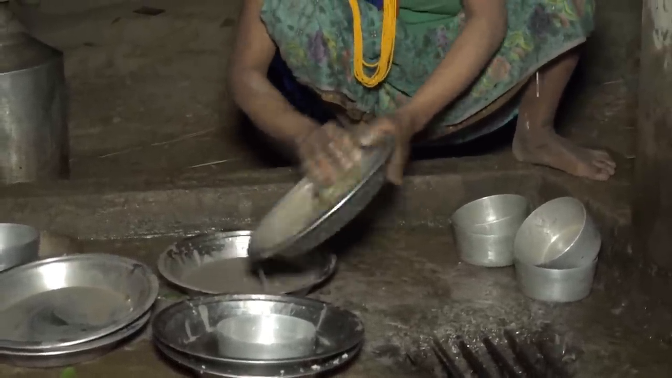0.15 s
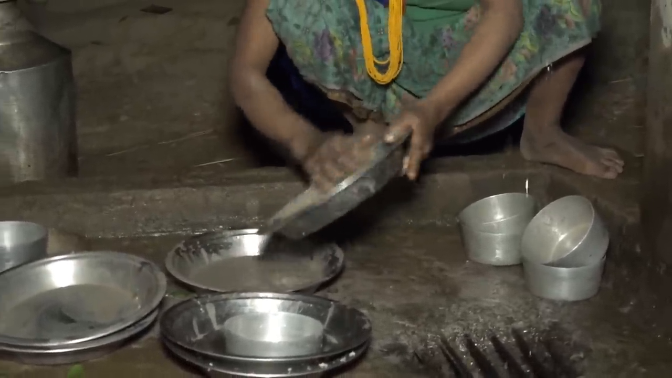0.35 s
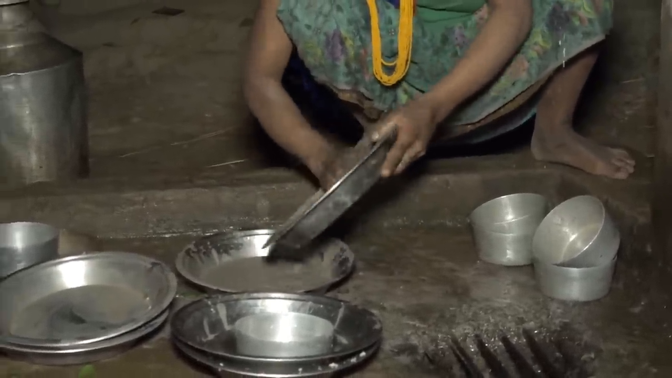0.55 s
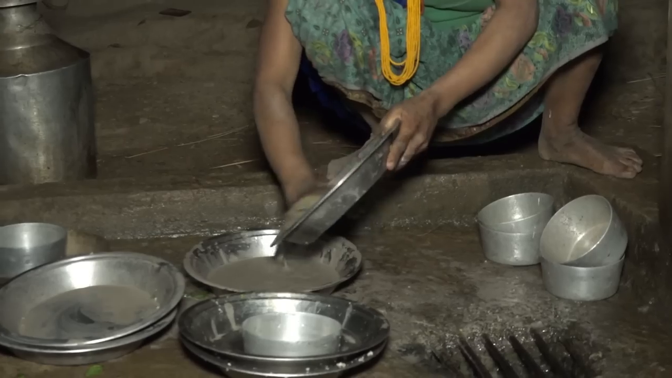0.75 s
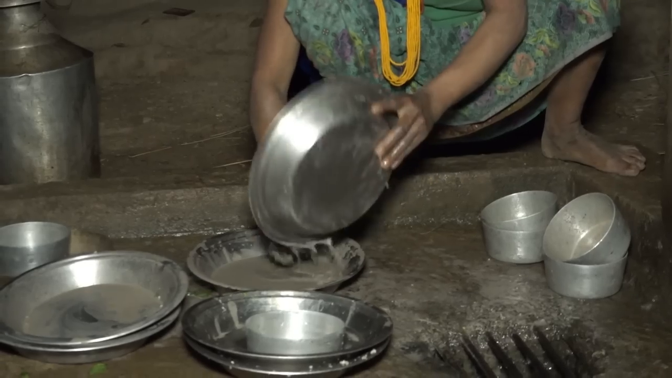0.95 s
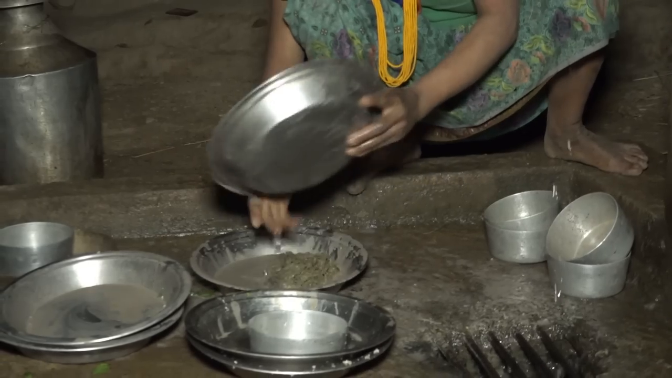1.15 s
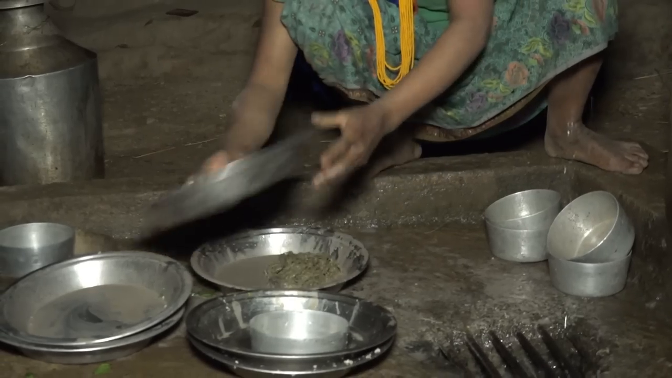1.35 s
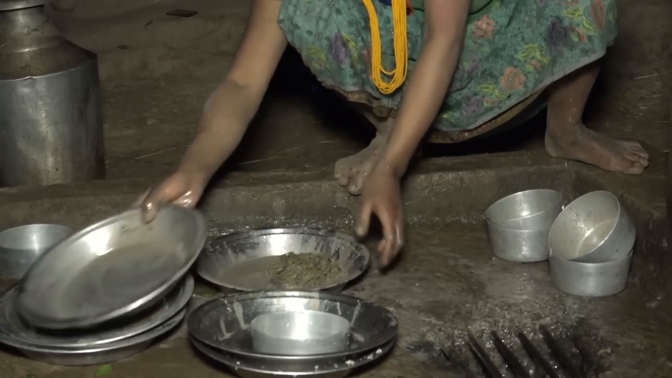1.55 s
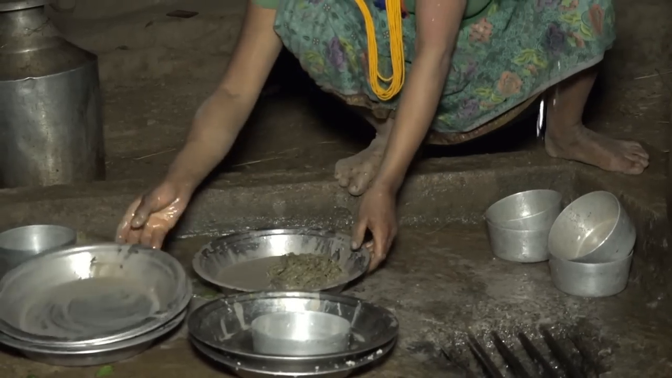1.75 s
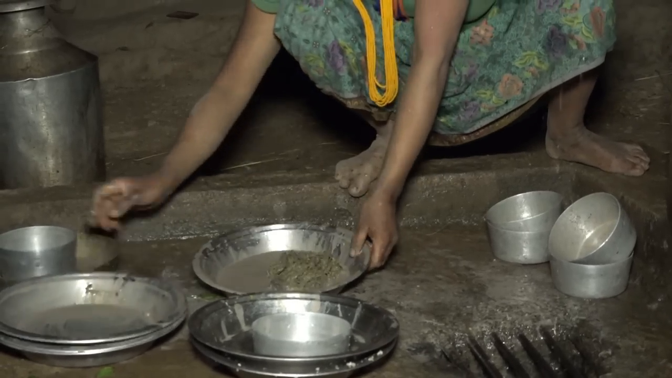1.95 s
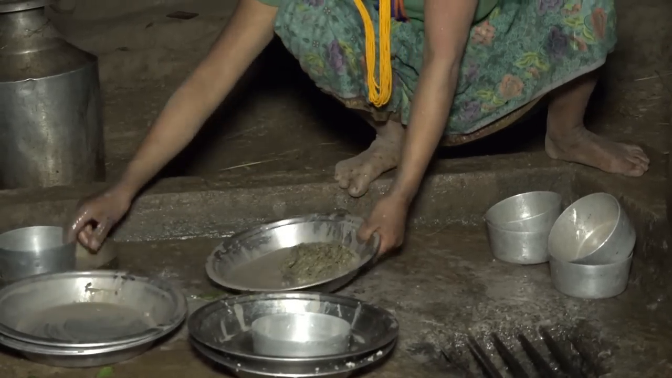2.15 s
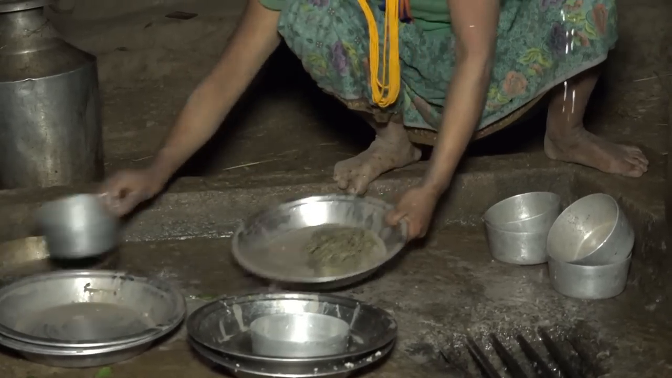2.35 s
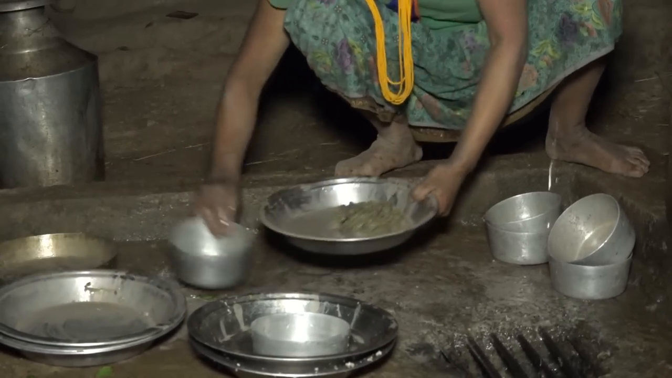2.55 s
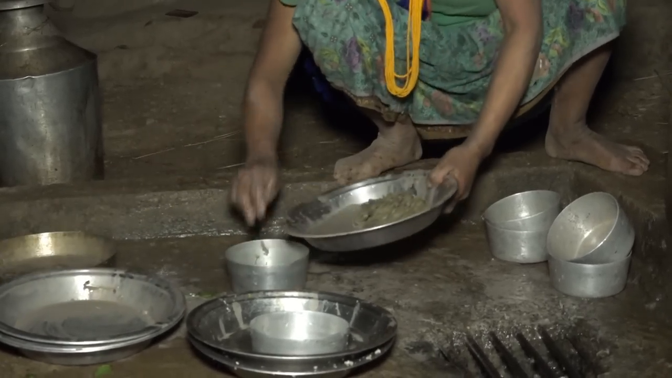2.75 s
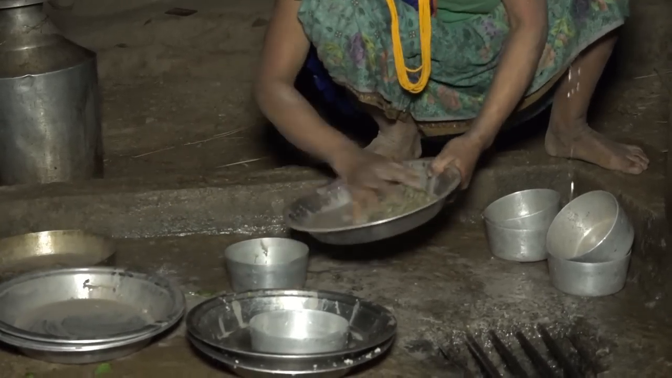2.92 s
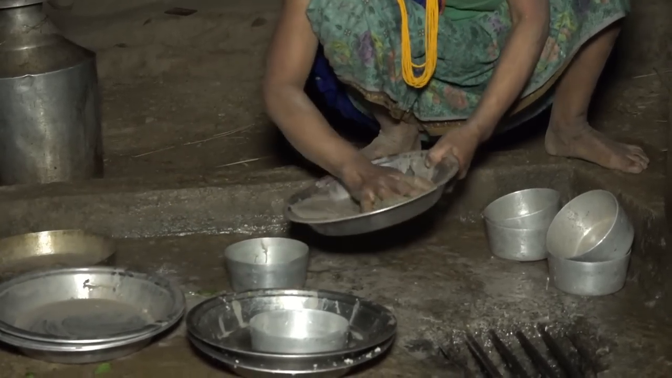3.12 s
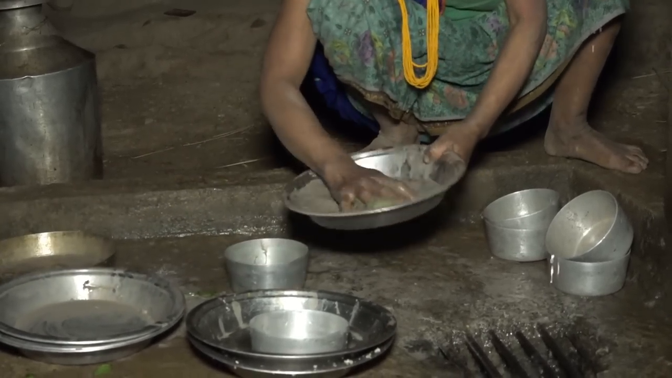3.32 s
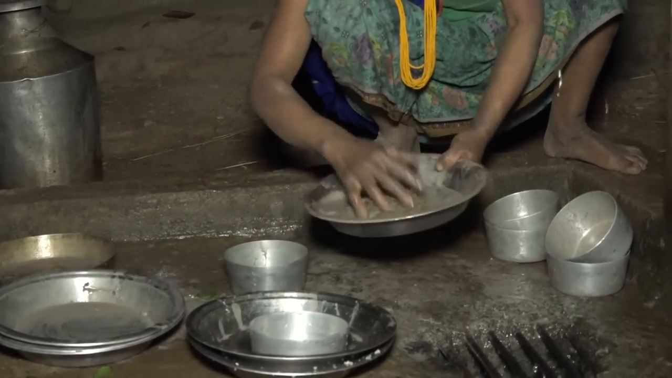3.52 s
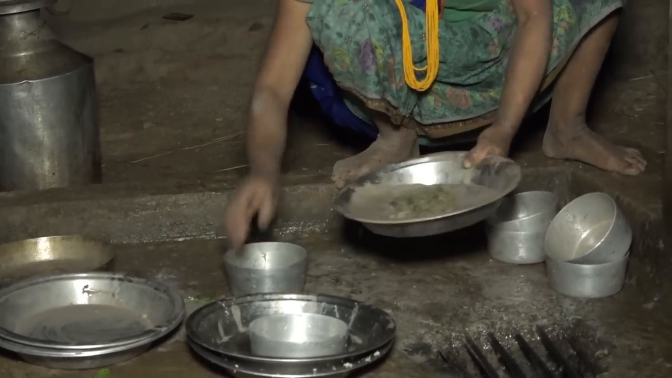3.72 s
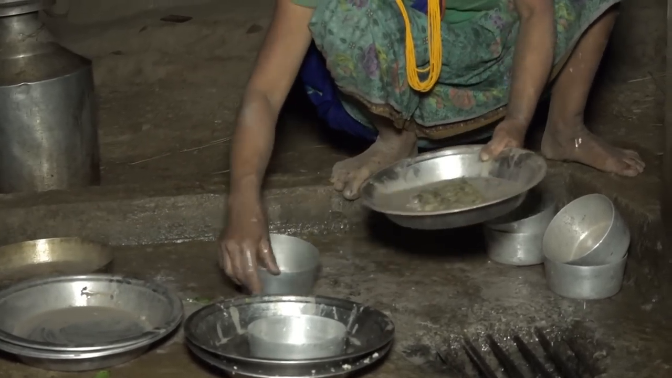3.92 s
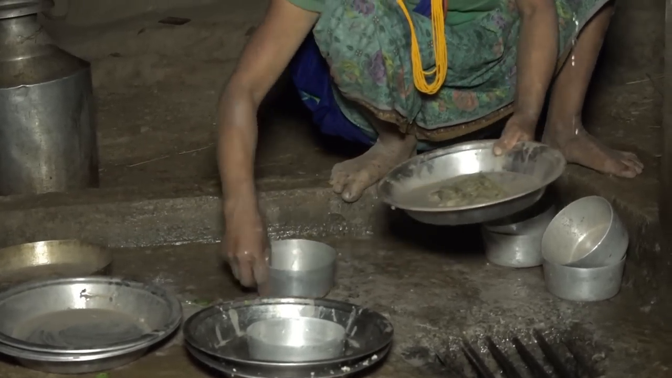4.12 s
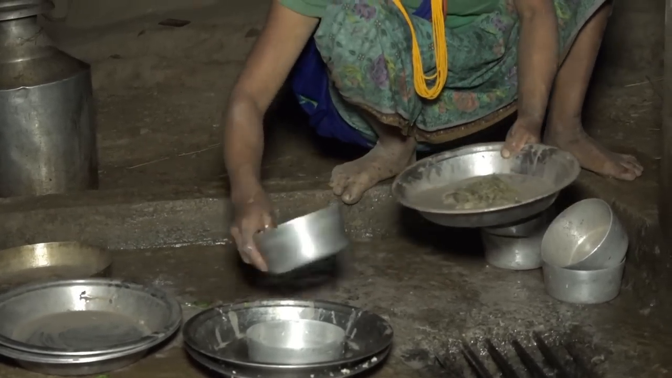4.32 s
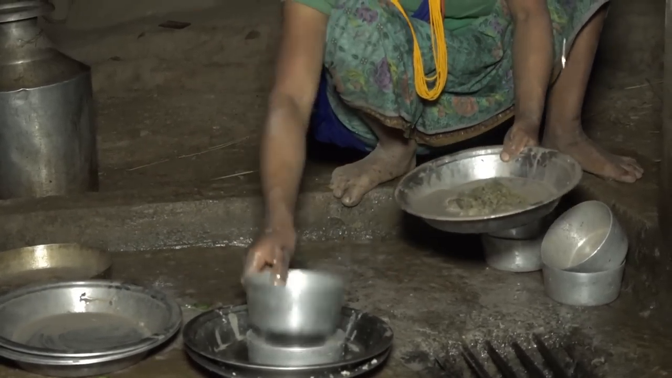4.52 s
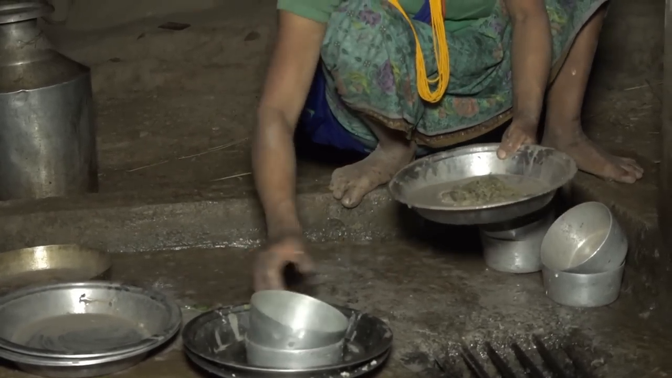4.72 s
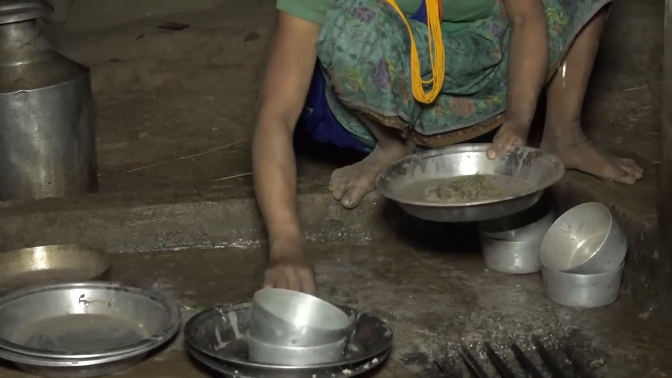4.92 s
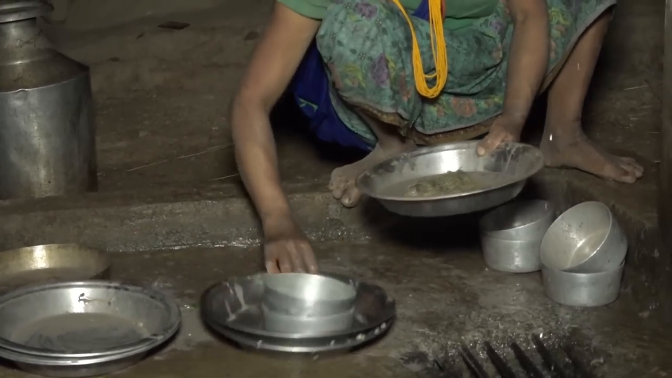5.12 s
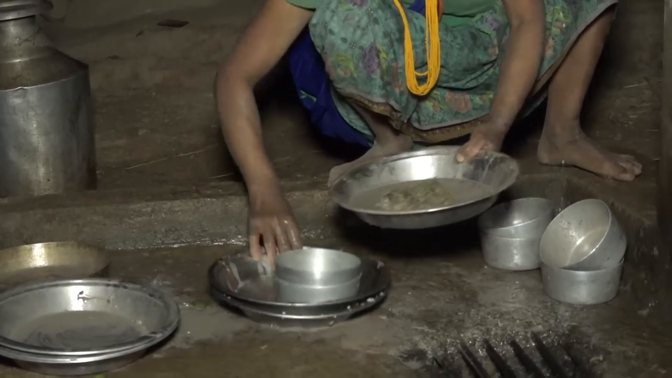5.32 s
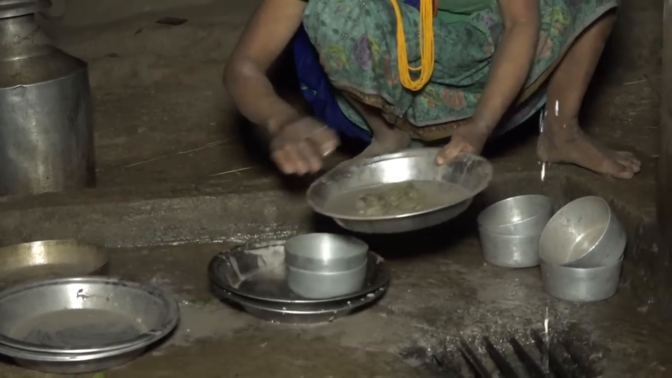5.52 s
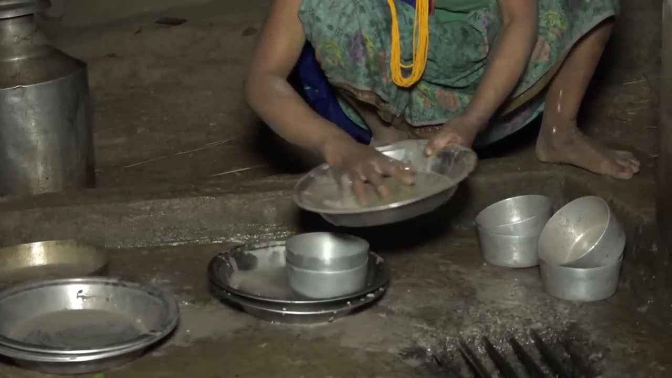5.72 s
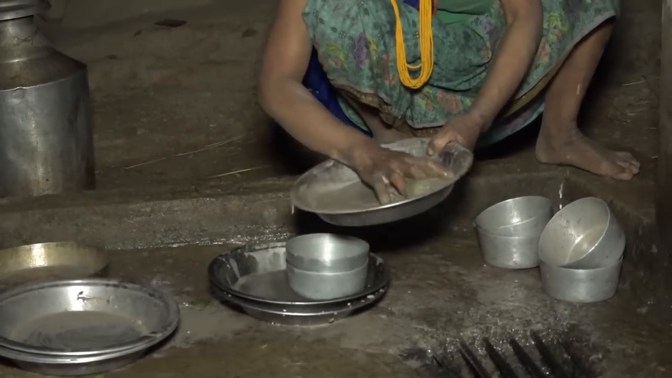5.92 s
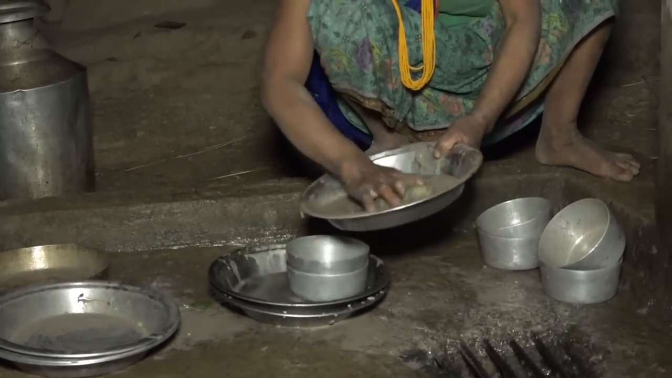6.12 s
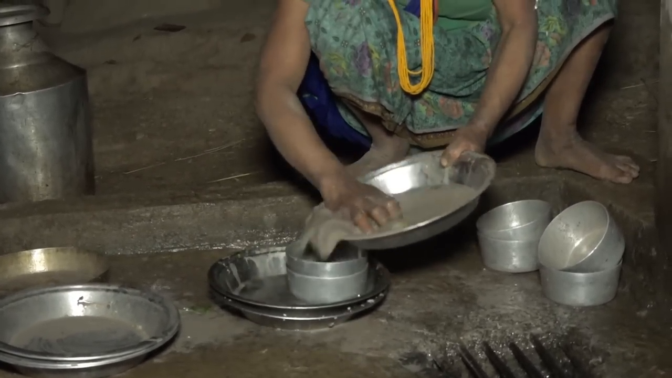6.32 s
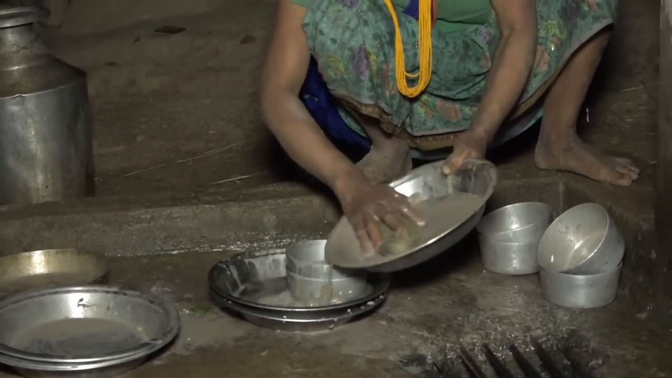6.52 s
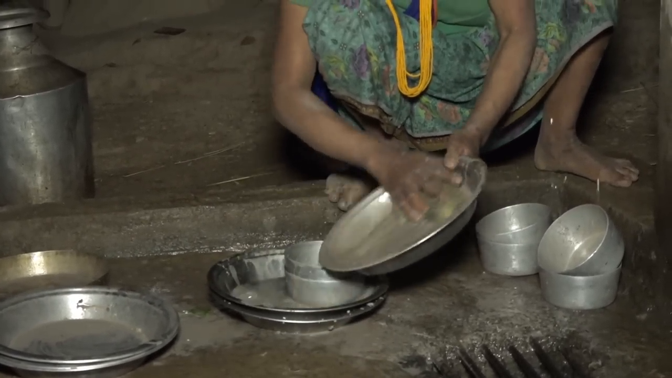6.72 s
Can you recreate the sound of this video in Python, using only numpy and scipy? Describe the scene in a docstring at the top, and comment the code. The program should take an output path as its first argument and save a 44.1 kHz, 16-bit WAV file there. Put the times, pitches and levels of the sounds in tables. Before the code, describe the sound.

Close up on a wet stone floor in a small room, water drops patter brightly while a hand rubs metal plates. A plate clashes and rasps onto a stack, a bowl is set down with a clank, then tipped and dropped into another. The pile scrapes over gritty stone, and finally water spatters and slops down with a hollow plop. Short reverberation, near-centred stereo, quiet background.

```python
"""Metal plates are washed by hand on a wet stone floor in a small room, heard from close by.
First, water noise and drops of snap, spray and bubbles spatter; soon a wet hand scours with swelling noise strokes.
Then a plate clashes on the stack and slides home: random slips rasp and ring its modes. A bowl is dragged off the
floor, set down, tipped and dropped into another, each blow mixing decaying tones with puffs of noise.
Last, the pile is dragged over the gritty floor, drops and slops fall, and poured water rumbles in low puffs."""
import sys
import numpy as np
from scipy import signal
from scipy.fft import rfft, irfft, next_fast_len
from scipy.io import wavfile
from scipy.ndimage import uniform_filter1d, map_coordinates

SR = 44100
rng = np.random.default_rng(int(sys.argv[2]) if len(sys.argv) > 2 else 0)


def put_to_file(sound):
    """Save the sound as 16-bit audio at rate SR, in the file named by the first command-line argument."""
    columns = np.atleast_2d(sound).T  # one column per channel
    safe = np.clip(columns, -1, 1)
    whole_steps = np.round(safe * 32767)
    wavfile.write(sys.argv[1], SR, whole_steps.astype(np.int16))


N = 298116  # length in samples
T = np.arange(SR // 2) / SR  # seconds since a blow
TOP_HZ = 16000  # nothing sounds above this


def amp(db):
    """Turn decibels into a plain gain."""
    return 10 ** (np.asarray(db) / 20)


def unit(x):
    """Scale x to an average (rms) level of 1."""
    return x / np.sqrt(np.mean(x ** 2) + 1e-20)


def struck(x):
    """Scale x to rms 1 over its first hundredth of a second."""
    return x / np.sqrt(np.mean(x[:SR // 100] ** 2) + 1e-20)


def along(points, hz):
    """Read a curve of (Hz, value) points, joined by straight lines on a log frequency axis."""
    f, v = np.transpose(points)
    return np.interp(np.log(hz + 1), np.log(f + 1), v)


def fade(t, t60):
    """Die away steadily, by 60 dB in t60 seconds."""
    return np.exp(-np.log(1000) * t / t60)


def add(track, s, x):
    """Mix x into the track at time s."""
    part = track[max(round(s * SR), 0):][:len(x)]
    part += x[:len(part)]


def wobble(rate):
    """Draw a smooth random curve through `rate` random points a second."""
    points = rng.standard_normal(int(N * rate / SR) + 4)
    return map_coordinates(points, [np.arange(N) * rate / SR])


def shaped(x, db_of_hz):
    """Filter x to a dB curve, with no sound ahead of its cause (a minimum-phase filter)."""
    m = 2 * next_fast_len(min(len(x), len(x) // 2 + SR // 4), real=True)
    gain = amp(db_of_hz(np.fft.rfftfreq(m, 1 / SR)))
    cepstrum = irfft(np.log(gain + 1e-6), m)
    # folding the second half onto the first makes the filter causal
    cepstrum[1:m // 2] *= 2
    cepstrum[m // 2 + 1:] = 0
    return irfft(rfft(x, m) * np.exp(rfft(cepstrum)), m)[:len(x)]


def coloured(x, spectrum):
    """Give x the colour of (Hz, dB) points."""
    return shaped(x, lambda hz: along(spectrum, hz))


def hill(hz, centre_hz, steep_db):
    """A hump in dB that is steep_db down an octave from its centre."""
    return -steep_db * np.log2((hz + 1) / centre_hz) ** 2


def grains(rate, spread_db):
    """Scatter tiny clicks of uneven size, about `rate` a second."""
    size = amp(spread_db * np.clip(rng.standard_normal(N), -2, 2))
    falls = rng.random(N) < rate / SR
    return unit(falls * size * rng.choice([-1, 1], N))


def burst(t60, rise=0.00017, size=4096):
    """A puff of noise that swells and dies."""
    t = T[:size]
    swell = np.minimum(t / rise, 1)
    return rng.standard_normal(size) * swell * fade(np.maximum(t - rise, 0), t60)


def puff(spectrum, t60):
    """The noise of a contact, with a given colour and life."""
    return struck(coloured(burst(t60, size=len(T)), spectrum))


def through(x, response):
    """Let every sample of x set off a response of energy 1 (convolution)."""
    return signal.fftconvolve(x, response / np.linalg.norm(response))[:N]


def ring(modes):
    """One blow on metal: each mode has a slightly new strength and an unsteady pitch."""
    hz, db, t60 = np.transpose(modes)[:, :, None]
    strength = amp(db + rng.standard_normal(hz.shape))
    waver = np.cumsum(rng.standard_normal((len(hz), len(T))), 1) * hz / SR * .02
    cycles = hz * T + waver + rng.random(hz.shape)
    waves = strength * np.sin(2 * np.pi * cycles) * fade(T, t60)
    soft_start = 1 - fade(T, .004)
    soft_end = np.minimum((T[-1] - T) * 10, 1)
    return struck(waves.sum(0) * soft_start * soft_end)


def bubbles(centre_hz, spread, t60, count=5, size=4096):
    """A few tiny bubbles ring out around one pitch, scattered by `spread` octaves."""
    t = T[:size]
    octaves, phase, db = np.clip(rng.standard_normal((3, count, 1)), -2, 2)
    pitch_hz = centre_hz * 2 ** (spread * octaves)
    waves = amp(2 * db) * np.sin(2 * np.pi * pitch_hz * t + phase)
    return struck(waves.sum(0) * fade(t, t60) * (1 - fade(t, 0.0096)))


# colour of a drop on wet stone, before its own tilt: (frequency [Hz], level per Hz [dB])
SPLAT_COLOUR = [(300, -35.5), (1000, -27), (1700, -21), (2400, -5), (3200, -10), (4300, -1.5), (6300, 3),
                (9200, 0.5), (12500, -6), (16000, -16)]
# usual attack and centre; bubbles against the slap, first snap gain before the drop is scaled
DROP_RISE_S, DROP_HZ, BUBBLE_DB, SNAP_DB = 0.00091, 6730, -5, -1.5


def drop(centre_hz, rise_s, size=1536):
    """A drop snaps on the wet stone, breaks into spray and traps bubbles, all around its own centre."""
    knots = np.geomspace(1500, TOP_HZ, 16)
    snap = amp(SNAP_DB) * burst(t60=0.004, rise=rise_s, size=size)
    spray = burst(t60=0.017, rise=rise_s, size=size) + burst(t60=.036, rise=rise_s, size=size)
    # a lower centre tilts the colour towards the bass; random bumps make each drop different
    tilt_db = 11 * np.log2(centre_hz / DROP_HZ) * np.log2(knots / centre_hz)
    own_colour = np.c_[knots, tilt_db + 3 * rng.standard_normal(len(knots))]
    slap = struck(shaped(snap + spray, lambda hz: along(SPLAT_COLOUR, hz) + along(own_colour, hz)))
    return slap + amp(BUBBLE_DB) * bubbles(0.81 * centre_hz, spread=0.3, t60=0.029, size=size)


PATTER_PER_S, PATTER_RANGE_DB = 61, 15.5  # rate of small drops, range of their sizes


def patter():
    """Small drops of random size, colour and softness fall at random moments."""
    out = np.zeros(N)
    for when, small, pitch, soft in rng.random((int(PATTER_PER_S * N / SR), 4)):
        splat = drop(DROP_HZ * 2 ** (.6 * (pitch - .4)), DROP_RISE_S * 4 ** (soft - .4))
        add(out, when * N / SR, amp(-PATTER_RANGE_DB * small) * splat)
    return out


# how much water runs off onto the floor: (time [s], level [dB])
RUNOFF_FLOW = [(0.0, -40.5), (0.4, -40), (0.65, -41), (0.95, -36), (1.2, -41.5), (1.55, -44), (2.05, -39.5),
               (2.3, -39.5), (2.5, -44), (3.15, -48), (3.75, -43), (4.1, -44), (4.75, -49.5), (5.45, -38.5),
               (5.6, -43), (5.75, -41), (6.1, -44), (6.76, -39.5)]
# colours of fizz, swirling water and rubbing: (frequency [Hz], level per Hz [dB])
FIZZ_COLOUR = [(1060, -46.5), (1800, -11), (2550, -1), (2920, -2), (4170, 2), (6020, 2), (9080, -2),
               (13300, -10.5), (16000, -6.5)]
SWIRL_COLOUR = [(60, -22.5), (130, -1.5), (350, 6.5), (550, 2.5), (900, -24)]
RUB_COLOUR = [(350, -13), (650, 6), (1200, 3.5), (2000, 2), (3200, -17)]
# against the flow: largest patter drops, then treble, middle and bass of the running water
PATTER_DB, FIZZ_DB, SPLASH_DB, GURGLE_DB = 7, -6, -19.5, -20.5


def runoff():
    """Water runs off onto the floor: its flow drives a patter, a fine fizz, a splash and a faint gurgle."""
    flow = amp(np.interp(np.arange(N) / SR, *np.transpose(RUNOFF_FLOW)))
    fizz = unit(coloured(grains(rate=6000, spread_db=4) * amp(2.5 * wobble(60)), FIZZ_COLOUR))
    splash = unit(coloured(grains(rate=3000, spread_db=4), RUB_COLOUR))
    gurgle = unit(coloured(rng.standard_normal(N), SWIRL_COLOUR))
    running = amp(FIZZ_DB) * fizz + amp(SPLASH_DB) * splash + amp(GURGLE_DB) * gurgle
    return flow * (amp(PATTER_DB) * patter() + running)


# the loudest single drops, of many pitches; one that has broken up in the air lands softly, with a slow rise:
# (time [s], slap level [dB], centre [Hz], rise [s])
LOUD_DROPS = [(0.019, -28, 7420, 0.00135), (0.133, -29.5, 6000, 0.00055), (0.218, -31.5, 4940, 0.00074),
              (0.253, -25.5, 5570, 0.00023), (0.3252, -31, 6930, 0.0033), (0.3771, -27, 6700, 0.0017),
              (0.544, -23, 6700, 0.00053), (0.577, -31, 6340, 0.0031), (0.775, -31.5, 5970, 0.00023),
              (0.8661, -30.5, 6550, .0008), (0.8816, -34.5, 7360, 0.0052), (0.9906, -29.5, 5660, 0.0016),
              (1.046, -30.5, 7240, 0.0016), (1.109, -32, 7000, .002), (1.1429, -25, 6130, 0.0015),
              (1.1945, -29, 7310, 0.0013), (1.258, -25, 6400, 0.0038), (1.3957, -30, 5670, 0.0013),
              (1.437, -29.5, 4100, 0.001), (2.114, -29.5, 5840, 0.001), (2.138, -35, 6170, .0007),
              (2.395, -36, 7170, 0.00066), (2.451, -31, 5000, 0.0024), (2.948, -35, 6100, .0013),
              (3.213, -33, 5980, 0.00064), (3.522, -29, 4820, 0.00073), (3.666, -33.5, 7150, 0.0028),
              (3.722, -29, 7840, .0007), (3.892, -32, 6400, .0009), (3.967, -31, 5700, 0.0022),
              (4.048, -33.5, 4730, 0.0014), (4.069, -32, 6700, .0007), (4.11, -33, 6900, .004),
              (4.382, -41, 7900, 0.0025), (4.439, -27, 6620, 0.0094), (4.483, -35, 6560, .0025),
              (4.539, -30.5, 6460, 0.0021), (4.852, -35, 6260, 0.00052), (5.49, -28, 6510, 0.00077),
              (5.555, -22.5, 3820, 0.001), (5.672, -30, 5470, 0.0037), (5.716, -29.5, 5720, 0.0053),
              (5.789, -24, 7780, 0.0021), (5.833, -31, 8850, .001), (5.932, -33.5, 5430, .0013),
              (6.03, -29.5, 8200, 0.00066), (6.097, -23, 7930, 0.004), (6.153, -33.5, 6480, 0.00059),
              (6.215, -28.5, 6970, 0.006), (6.235, -34, 6560, 0.00094), (6.309, -33, 7500, .0017),
              (6.371, -32.5, 7350, 0.0005), (6.481, -25, 5250, 0.0004), (6.6116, -23.5, 6020, 0.00044),
              (6.672, -29, 7970, .0008), (6.731, -29.5, 6850, 0.0019)]


def drips():
    """The loudest single drops, of many pitches, stand out of the patter as they hit the stone."""
    out = np.zeros(N)
    for s, db, centre_hz, rise_s in LOUD_DROPS:
        add(out, s, amp(db) * drop(centre_hz, rise_s))
    return out


# soft bumps of the hand and plate, and near 6.5 s the low rumble of poured water:
# (time [s], level before a 2.5 dB cut [dB], pitch [Hz])
BUMPS_AND_POUR = [(0.158, -55, 180), (1.155, -46, 159), (4.836, -54, 216), (5.605, -51, 200),
                  (6.475, -53, 54.6), (6.505, -57, 55.4)]


def bumps_and_pour():
    """A soft bump or pour rumble is a short and a long puff of noise, narrowed around one low pitch."""
    out = np.zeros(N)
    for s, db, pitch_hz in BUMPS_AND_POUR:
        push = burst(t60=0.036) + amp(-7) * burst(t60=0.18)
        body = shaped(push, lambda hz: hill(hz, pitch_hz, steep_db=19.0).clip(-60))
        add(out, s, amp(db - 2.5) * unit(body))
    return out


# strokes of the wet hand, and at 2.23 s the scrape of a bowl dragged off the floor:
# (time of the peak [s], length [s], swirl level [dB], rub level [dB])
RUBBING_STROKES = [(0.654, 0.3, -60, -66.5), (1.122, 0.14, -57.5, -48), (2.047, 0.56, -55.5, -51.5),
                   (2.232, 0.19, -75, -44.5), (2.48, 0.3, -61, -66), (3.32, 0.54, -57, -65.5),
                   (4.006, 0.37, -47.5, -48.5), (4.482, 0.46, -56.5, -67), (4.884, 0.28, -54, -61),
                   (5.724, 0.73, -55, -64.5), (6.53, 0.42, -59.5, -54.5)]
STROKE_RISE = 0.47  # share of a stroke spent gaining speed


def rubbing():
    """Each hand stroke or bowl scrape gains speed and slows again, mixing watery swirl and gritty rub."""
    t, swirl, rub = np.arange(N) / SR, np.zeros(N), np.zeros(N)
    for s, length, swirl_db, rub_db in RUBBING_STROKES:
        start, stop = s - STROKE_RISE * length, s + (1 - STROKE_RISE) * length
        speed = np.sin(np.pi / 2 * np.interp(t, [start, s, stop], [0, 1, 0])) ** 2
        swirl += amp(swirl_db) * speed
        rub += amp(rub_db) * speed
    water = unit(coloured(rng.standard_normal(N) * amp(3.5 * wobble(25)), SWIRL_COLOUR))
    grit = unit(coloured(grains(rate=2000, spread_db=-0.5), RUB_COLOUR))
    return swirl * water + rub * grit


# wet wad and slops of water falling: (time [s], level [dB], centre [Hz], spray level [dB])
WET_SLOPS = [(1.312, -16.5, 1870, -25), (1.337, -43, 1560, -38), (6.295, -49, 870, -61),
             (6.389, -45, 910, -61), (6.529, -34.5, 1110, -30), (6.544, -16.5, 810, -24.5),
             (6.561, -34, 714, -29.5)]
# colour of a hollow wet blow, moved to each blow's centre: (frequency for a 1 kHz centre [Hz], level per Hz [dB])
PLOP_COLOUR = [(100, -29.5), (300, -26.5), (540, -22.5), (670, -4.5), (1000, -1.5), (1220, 1), (1550, -12),
               (3000, -24), (6000, -60.5)]


def slops():
    """A falling slop gives a dull, hollow puff of noise under a little bright spray."""
    out = np.zeros(N)
    for s, db, centre_hz, spray_db in WET_SLOPS:
        push = burst(t60=0.036) + amp(-26) * burst(t60=0.12, rise=0.019)
        body = shaped(push, lambda hz: along(PLOP_COLOUR, hz * 1000 / centre_hz))
        spray = shaped(burst(t60=0.048), lambda hz: hill(hz, 3900, steep_db=4.5).clip(-60))
        add(out, s, amp(db) * struck(body) + amp(spray_db) * struck(spray))
    return out


SETTLE_DB_PER_S, STOP_T60_S = 19, 0.18  # fading of the body once up to speed; how fast a push stops


def pushes(rows):
    """Gains of body and rasp: a push speeds up, holds and stops; the body fades as the plate beds in."""
    body, rasp = np.zeros((2, N))
    t = np.arange(SR) / SR
    for s, attack_s, hold_s, body_db, scrape_db in rows:
        moving = np.maximum(t - attack_s, 0)
        stopping = fade(np.maximum(moving - hold_s, 0), STOP_T60_S)
        speed = np.minimum(t / attack_s, 1) ** 2 * stopping
        add(body, s, amp(body_db - SETTLE_DB_PER_S * moving) * speed)
        add(rasp, s, amp(scrape_db) * speed)
    return body, rasp


def split_bands(x):
    """Split x at 2800 Hz into a low and a high part, each scaled to rms 1."""
    filters = [signal.butter(4, 2800, kind, fs=SR, output="sos") for kind in ("low", "high")]
    return [unit(signal.sosfilt(sos, x)) for sos in filters]


# ringing modes of the plate: (frequency [Hz], typical strength [dB], time to fade by 60 dB [s])
PLATE_MODES = [(372, -6, .22), (438, -3, .22), (488, 0, .22), (575, -2, .3), (676, -3, .22), (955, -6, .2),
               (1090, -8, .7), (1155, -7, .45), (1195, -8, .3), (1507, -14, .35), (1940, -11, .2),
               (2212, -6, .2), (2390, -10, .22), (2620, -12, .15)]


def scrape(rows, spectrum, rate, judder_db, ring_db):
    """A moving plate sticks and slips: the slips rasp directly and keep its modes ringing."""
    body, rasp = pushes(rows)
    judder = amp(judder_db * wobble(rate=130))
    slips = signal.stft(grains(rate, spread_db=4) * judder, nperseg=512)[2]
    # as the contact travels it favours ever new ones of the thin metal's crowded modes
    favour = uniform_filter1d(rng.standard_normal(slips.shape), 2, 0)
    favour = unit(uniform_filter1d(favour, 7, 1))
    slips = signal.istft(slips * amp(3.8 * favour), nperseg=512)[1][:N]
    low, high = split_bands(coloured(slips, spectrum))
    catches = unit(grains(rate=500, spread_db=3) * judder)  # coarse grit catches the rim
    ringing = through(body * catches, ring(PLATE_MODES))
    return body * low + amp(ring_db) * ringing + rasp * high


# pushes of the plate on the stack: (time [s], attack [s], hold [s], starting body level [dB], scrape level [dB])
SLIDE_PUSHES = [(1.598, 0.013, 0.11, -24, -23.5), (1.71, 0.033, 0.19, -30, -24)]
# colour of plate on plate: (frequency [Hz], level per Hz [dB])
STACK_COLOUR = [(47, -37), (80, -25), (159, -12), (265, -16.5), (493, 0), (718, -14.5), (1140, -1.5),
                (1560, -18), (2220, -10), (2970, -18.5), (3320, -12), (6890, -4.5), (14600, -23),
                (16000, -23.5)]


def slide():
    """A plate slides home on the stack, rasping and ringing strongly."""
    return scrape(SLIDE_PUSHES, STACK_COLOUR, rate=5000, judder_db=1.8, ring_db=-5.5)


# plate rims strike the stack and the floor: (time [s], ring level [dB], clash level [dB])
RIM_CLASHES = [(1.6, -21, -17), (1.604, -25, -19), (1.638, -39, -32), (1.655, -36, -23), (1.926, -67, -38),
               (5.317, -45, -21), (5.346, -55, -31), (5.359, -45, -25.5)]
# colour of the clash noise: (frequency [Hz], level per Hz [dB])
CLASH_COLOUR = [(30, -55), (150, -24), (1100, 2.5), (3800, -17), (5500, 2), (6900, 6), (9000, 7),
                (11000, -11), (16000, -19.5)]


def clashes():
    """A striking plate rim rings the plate's modes under a short puff of noise."""
    out = np.zeros(N)
    for s, ring_db, clash_db in RIM_CLASHES:
        clash = amp(clash_db) * puff(CLASH_COLOUR, t60=0.031)
        add(out, s, amp(ring_db) * ring(PLATE_MODES) + clash)
    return out


# wet metal sings where it is rubbed: (time [s], length [s], level [dB], pitch [Hz])
RUBBED_NOTES = [(2.422, 0.17, -51.5, 3340), (3.04, 0.18, -54, 677), (3.909, 0.1, -45, 4260),
                (6.004, 0.025, -48, 785)]


def squeaks():
    """Rubbing holds one mode of the wet metal in a short, unsteady note."""
    out = np.zeros(N)
    for s, length, db, pitch_hz in RUBBED_NOTES:
        swell = signal.windows.tukey(round(length * SR), .5)
        phase = 2 * np.pi * pitch_hz * np.arange(N) / SR
        note = unit(wobble(rate=108) * np.sin(phase) + wobble(rate=240) * np.cos(phase))
        add(out, s, amp(db) * swell * note[:len(swell)])
    return out


# the bowl lands on stone and rocks: (time [s], thud level [dB], ring level [dB], crack level [dB])
BOWL_LANDINGS = [(2.589, -13, -15, -20), (2.628, -32, -42, -39.5), (2.644, -29.5, -32, -40.5),
                 (2.68, -37.5, -59, -37.5), (2.694, -49, -45.5, -35)]
# modes of the free bowl: (frequency [Hz], typical strength [dB], time to fade by 60 dB [s])
BOWL_MODES = [(377, -29, 0.7), (908, -35, 1.8), (974, -14, 0.16), (1612, 4.5, 0.091), (2826, -5, 0.12),
              (2907, 2.5, 0.11), (3340, -7, .06), (4400, -13, .16), (4720, -7, .05), (5420, -9, .1),
              (6514, 7.5, 0.038), (7750, -8, .12), (9100, -9, .15), (9400, -7, .13), (11640, -10.5, .07)]
# colours of a bowl's dull thud and sharp crack: (frequency [Hz], level per Hz [dB])
THUD_COLOUR = [(30, -61), (100, -35.5), (350, -33), (600, 1.5), (850, 3.5), (1400, 2), (1900, -7.5),
               (3300, -12.5), (4200, -36.5)]
CRACK_COLOUR = [(30, -40), (180, -5.5), (600, -6.5), (2000, -7.5), (4000, 0), (6500, 3), (9000, -1.5),
                (12000, -6.5), (16000, -14)]


def set_down():
    """A bowl lands on the stone and rocks: a dull thud, a sharp crack and the free bowl's ring."""
    out = np.zeros(N)
    for s, thud_db, ring_db, crack_db in BOWL_LANDINGS:
        thud = amp(thud_db) * puff(THUD_COLOUR, t60=.035)
        crack = amp(crack_db) * puff(CRACK_COLOUR, t60=0.014)
        add(out, s, thud + amp(ring_db) * ring(BOWL_MODES) + crack)
    return out


# the bowl knocks as it is tipped and lifted: (time [s], thud level [dB], ring level [dB], crack level [dB])
TIPPING_KNOCKS = [(3.853, -34.5, -40, -39), (3.99, -29.5, -33, -35), (4.02, -35.5, -31.5, -43),
                  (4.149, -22, -23.5, -36), (4.434, -31.5, -57, -48)]
# modes of the gripped bowl: (frequency [Hz], typical strength [dB], time to fade by 60 dB [s])
GRIPPED_MODES = [(367, -10.5, 0.13), (790, 3.5, 0.039), (981, 9, 0.046), (1436, -7.5, 0.14),
                 (1615, -4, 0.088), (2060, -9, 0.087), (3660, -7, 0.045), (4150, -7, 0.038)]


def tipping():
    """A bowl knocks while the hand grips it, ringing in the gripped bowl's own modes."""
    out = np.zeros(N)
    for s, thud_db, ring_db, crack_db in TIPPING_KNOCKS:
        thud = amp(thud_db) * puff(THUD_COLOUR, t60=0.032)
        crack = amp(crack_db) * puff(CRACK_COLOUR, t60=0.044)
        add(out, s, thud + amp(ring_db) * ring(GRIPPED_MODES) + crack)
    return out


CHATTER_FROM_S, CHATTER_TO_S, CHATTER_PER_S = 3.925, 4.045, 55
CHATTER_DB = -43  # each part of a middling tap


def chatter():
    """The tipping bowl's base touches the stone in a quick, uneven run of light taps."""
    out = np.zeros(N)
    count = int((CHATTER_TO_S - CHATTER_FROM_S) * CHATTER_PER_S)
    for k, (late, size) in enumerate(rng.random((count, 2))):
        tap = puff(THUD_COLOUR, t60=0.025) + ring(GRIPPED_MODES) + puff(CRACK_COLOUR, t60=0.02)
        add(out, CHATTER_FROM_S + (k + late) / CHATTER_PER_S, amp(CHATTER_DB) * (.5 + size) * tap)
    return out


# the bowl drops into another: (time [s], rim level [dB], seated level [dB], crack level [dB])
NESTING_BLOWS = [(4.567, -15.5, -35.5, -25.5), (4.571, -16, -43, -16.5), (4.585, -14.5, -41, -29),
                 (4.607, -39, -16.5, -17), (4.612, -34, -21.5, -21.5), (4.671, -59, -60, -35.5)]
# modes of the bowl struck on its rim, then seated: (frequency [Hz], typical strength [dB], time to fade by 60 dB [s])
RIM_MODES = [(683, -7.5, 0.091), (2017, -7, 0.029), (2929, -16.5, 0.12), (4070, -20, .06), (4411, -4, 0.07),
             (5400, -3, 0.029), (5250, 3, 0.018), (5600, 0.5, .05), (6840, 4.5, 0.031), (6440, -7, 0.043),
             (7180, -6, .05), (8500, -4, 0.033), (10400, -16.5, 0.037)]
SEATED_MODES = [(510, -10, 0.21), (618, 5.5, 0.036), (1623, -20, 0.23), (2497, -8.5, 0.15),
                (2700, -23, 0.19), (3260, 8, 0.037), (3644, -21.5, 0.54), (3740, -6, 0.09),
                (4670, 1.5, 0.062), (4920, -9, 0.26), (5580, -6, 0.13), (6030, 3.5, 0.073),
                (6498, -14.5, .17), (7000, 12.5, 0.031), (9000, -17, .16)]


def nesting():
    """A bowl strikes a second bowl and seats in it: the rim's modes give way to the seated bowl's."""
    out = np.zeros(N)
    for s, rim_db, seated_db, crack_db in NESTING_BLOWS:
        ringing = amp(rim_db) * ring(RIM_MODES) + amp(seated_db) * ring(SEATED_MODES)
        add(out, s, ringing + amp(crack_db) * puff(CRACK_COLOUR, t60=0.056))
    return out


# pushes of the pile over the floor: (time [s], attack [s], hold [s], starting body level [dB], scrape level [dB])
DRAG_PUSHES = [(4.905, 0.022, 0.046, -49, -37), (4.972, 0.017, 0.049, -38, -31),
               (5.035, 0.063, 0.2, -40, -30), (5.312, 0.008, 0.04, -37, -26)]
# colour of metal on gritty stone: (frequency [Hz], level per Hz [dB])
GRIT_COLOUR = [(47, -44), (80, -6), (163, 4.5), (316, 2), (441, 8.5), (734, -1.5), (1020, -2.5), (1140, 7),
               (1560, -4.5), (1860, 4), (2600, -3.5), (6890, 4.5), (8990, 1.5), (10500, -7), (16000, -19.5)]


def drag():
    """The pile is dragged over the gritty floor, rasping with only a little ring."""
    return scrape(DRAG_PUSHES, GRIT_COLOUR, rate=5000, judder_db=2, ring_db=-16)


# how long the walls' answer lasts: (frequency [Hz], time to fade by 60 dB [s])
WALL_FADES = [(150, 0.46), (1000, 0.25), (5000, 0.3), (14000, 0.045)]


def room(x):
    """The walls' answer: noise 3 ms late, each frequency dying at its own speed."""
    hz, t, z = signal.stft(rng.standard_normal(len(T)), SR, nperseg=256)
    dying = fade(t, along(WALL_FADES, hz)[:, None])
    tail = signal.istft(z * dying, SR, nperseg=256)[1]
    return through(x, np.concatenate([np.zeros(round(0.003 * SR)), tail]))


# colours of the low room air and the diffuse room air: (frequency [Hz], level per Hz [dB])
RUMBLE_COLOUR = [(15, -9), (28, -5.5), (60, 1.5), (100, -1.5), (300, -13), (1500, -23), (4000, -57.5)]
FAR_COLOUR = [(20, -0.5), (60, -8), (200, -2.5), (700, -1), (1300, -1.5), (2500, -19.5), (8000, -24.5),
              (16000, -25.5)]
# how much is scattered to the sides: (frequency [Hz], side gain [dB])
SIDE_WIDTH = [(100, -34), (400, -33), (1200, -26), (3000, -27), (5000, -23), (8000, -15), (14000, -9)]


def scene():
    """Everything sounds straight ahead; only scattered sound, mostly treble, and room air differ by ear."""
    water = drips() + bumps_and_pour() + slops()
    metal = slide() + clashes() + set_down() + tipping() + chatter() + nesting() + drag()
    echo = room(amp(-32.5) * water + amp(-20.5) * metal)
    air = amp(-65.5) * unit(coloured(rng.standard_normal(N), RUMBLE_COLOUR))
    mid = runoff() + water + rubbing() + metal + squeaks() + echo + air
    scattered = coloured(mid * unit(wobble(rate=400)), SIDE_WIDTH)
    side = scattered + amp(-68.5) * unit(coloured(rng.standard_normal(N), FAR_COLOUR))
    return np.array([mid + side, mid - side])


# how far the treble leans to the left: (frequency [Hz], left minus right [dB])
LEFT_LEAN = [(1500, 0), (3000, 0.1), (5500, 0.6), (9000, 1.1), (14000, 1)]


def record(dry):
    """Round off the highest peaks, lean the treble a little to the left and cut all above TOP_HZ."""
    rounded = dry / (1 + abs(dry / .9) ** 6) ** (1 / 6)
    m = next_fast_len(N + SR // 2)
    hz = np.fft.rfftfreq(m, 1 / SR)
    lean = amp(np.outer([.5, -.5], along(LEFT_LEAN, hz)))
    return irfft(rfft(rounded, m) * lean * (hz < TOP_HZ), m)[:, :N]


dry = scene()
out = record(dry)
put_to_file(out)
```